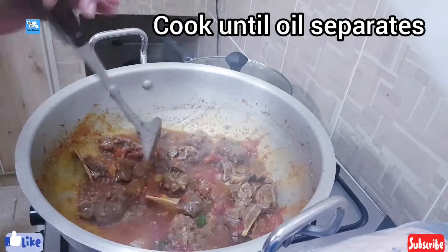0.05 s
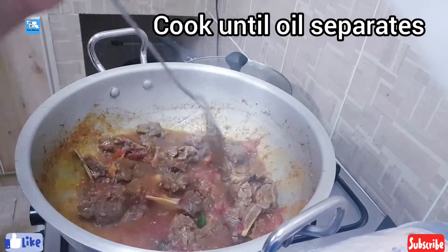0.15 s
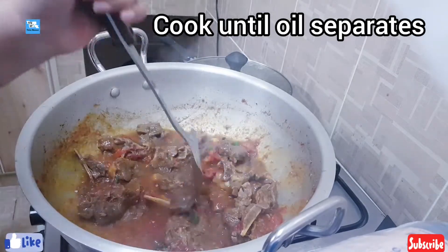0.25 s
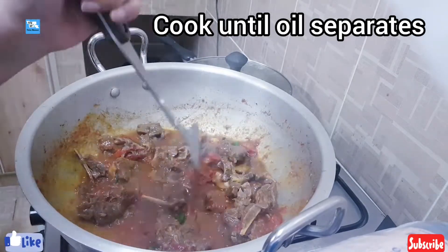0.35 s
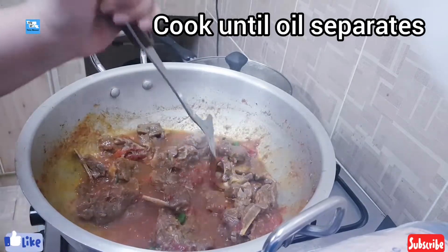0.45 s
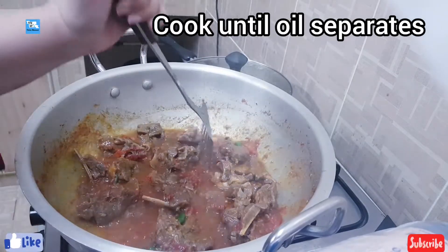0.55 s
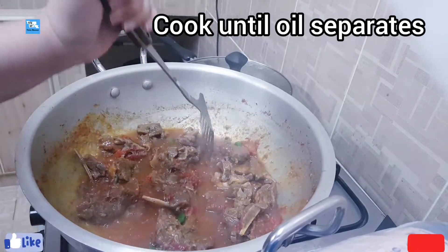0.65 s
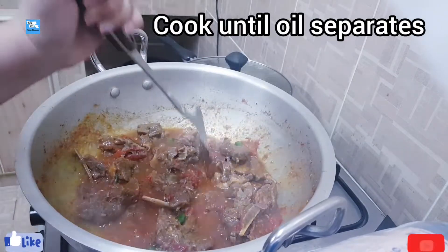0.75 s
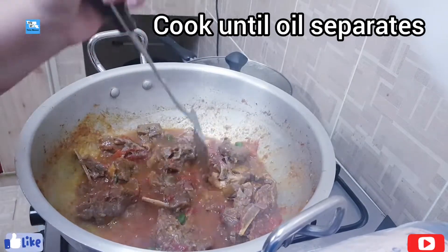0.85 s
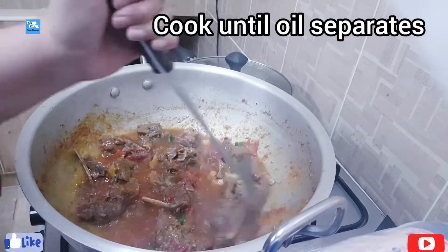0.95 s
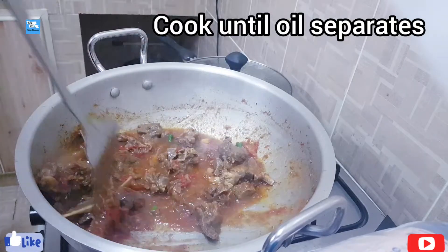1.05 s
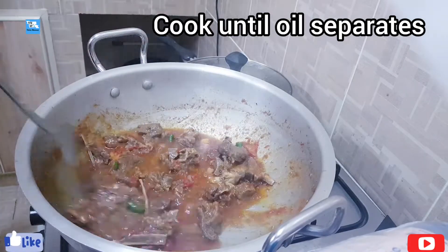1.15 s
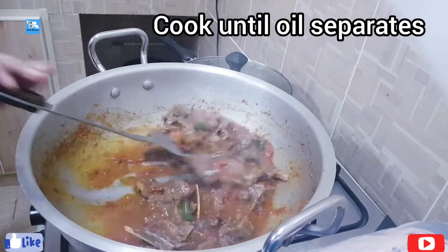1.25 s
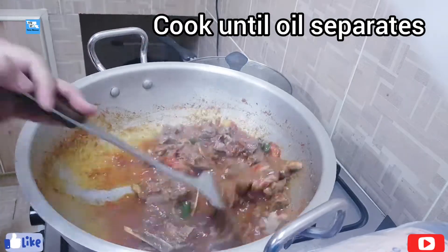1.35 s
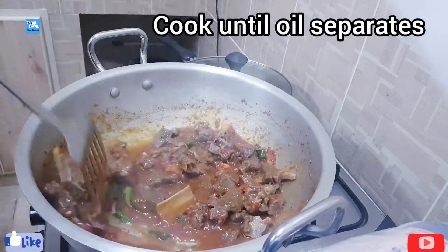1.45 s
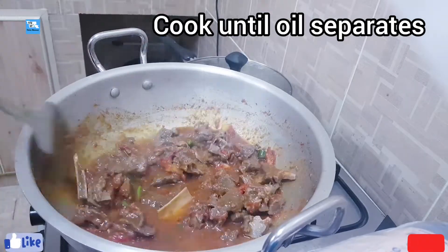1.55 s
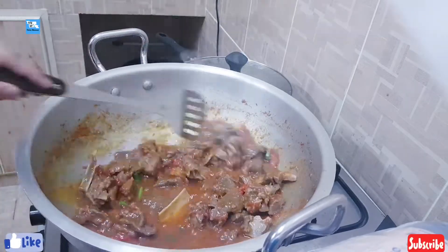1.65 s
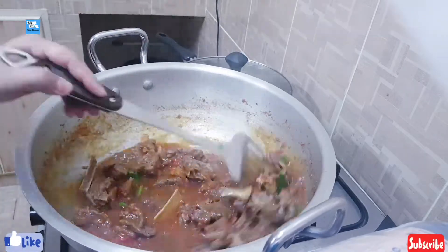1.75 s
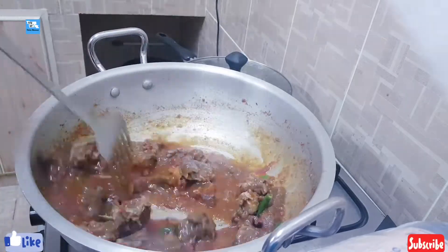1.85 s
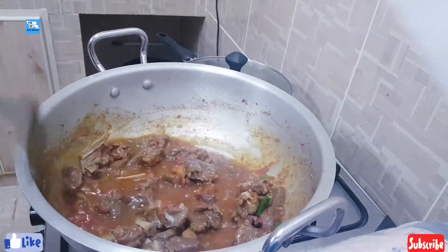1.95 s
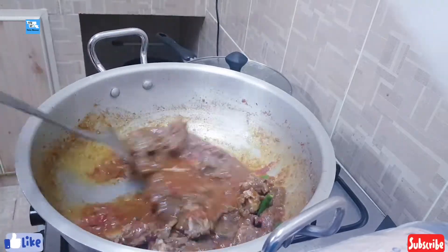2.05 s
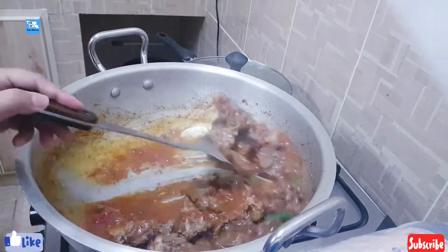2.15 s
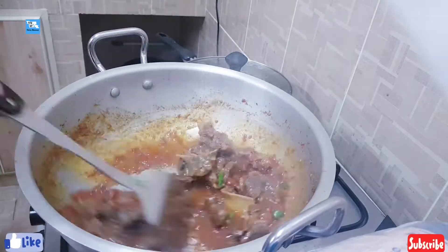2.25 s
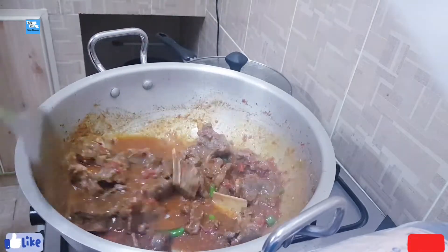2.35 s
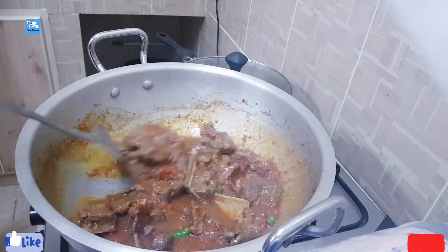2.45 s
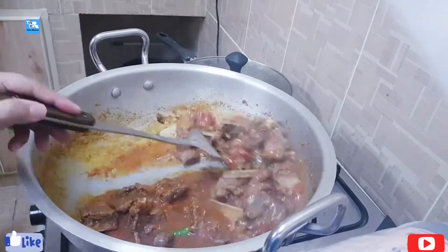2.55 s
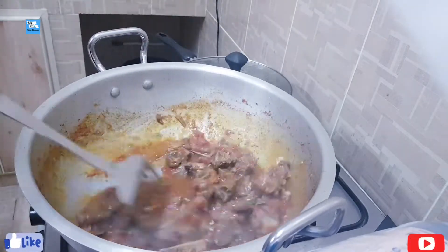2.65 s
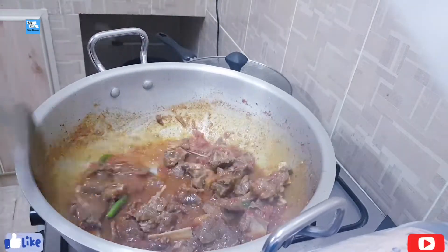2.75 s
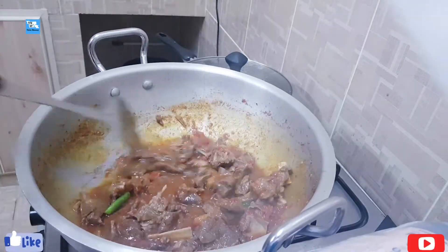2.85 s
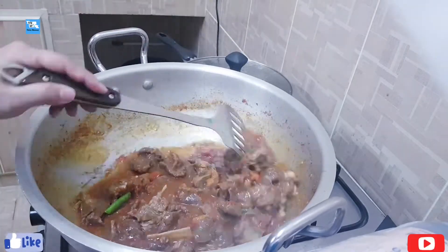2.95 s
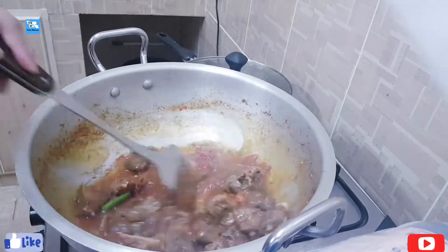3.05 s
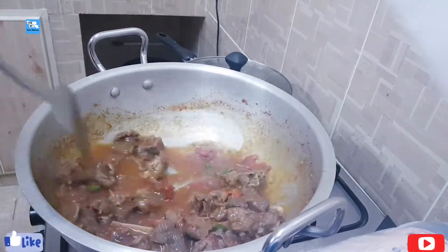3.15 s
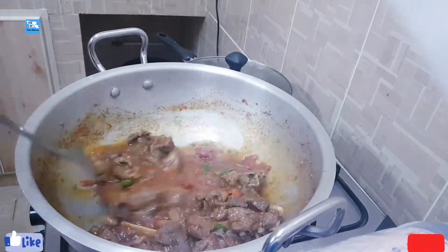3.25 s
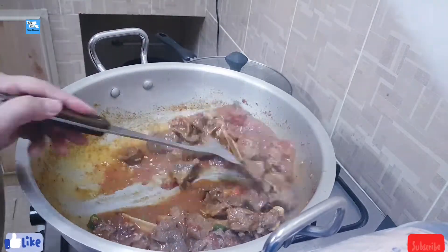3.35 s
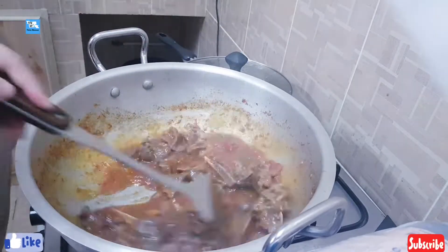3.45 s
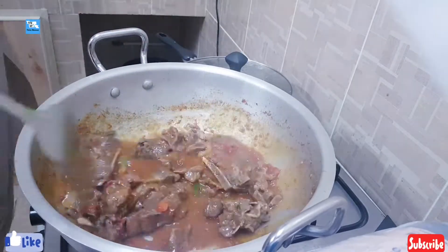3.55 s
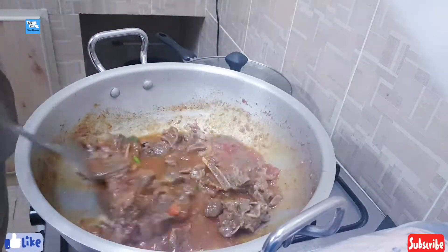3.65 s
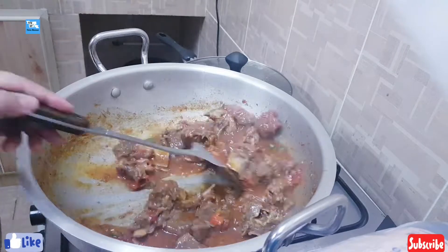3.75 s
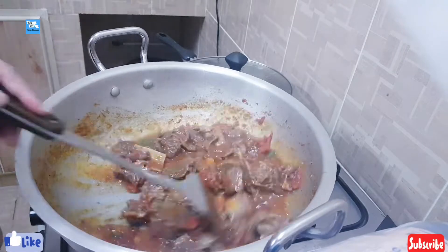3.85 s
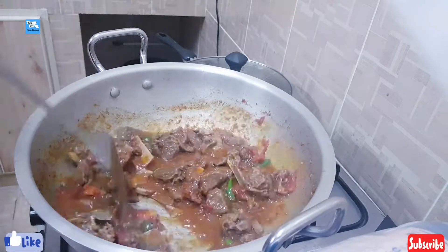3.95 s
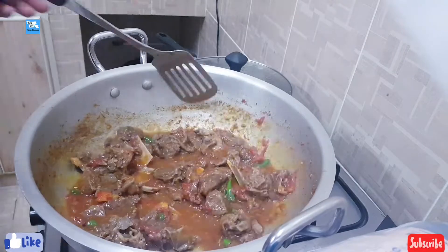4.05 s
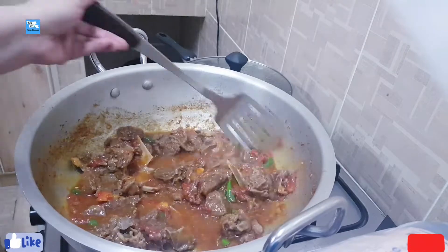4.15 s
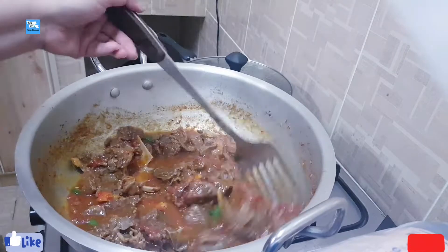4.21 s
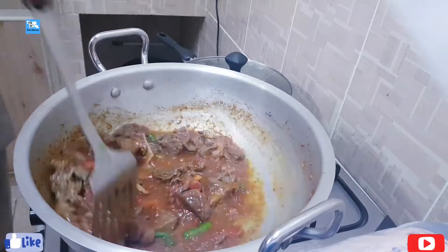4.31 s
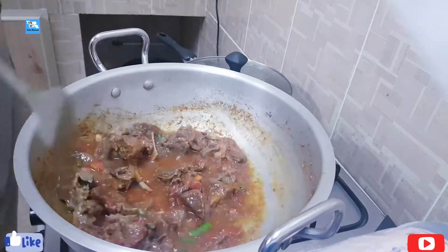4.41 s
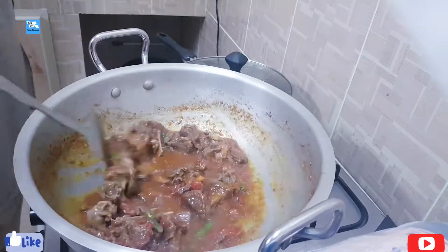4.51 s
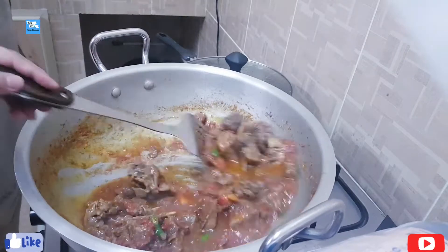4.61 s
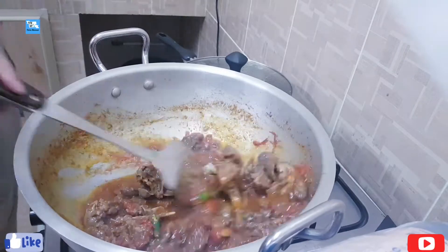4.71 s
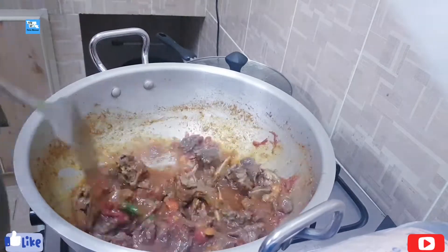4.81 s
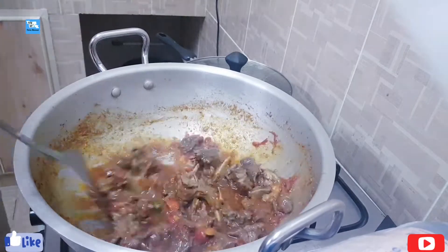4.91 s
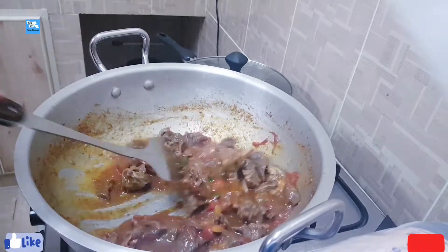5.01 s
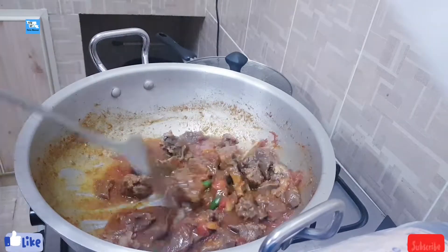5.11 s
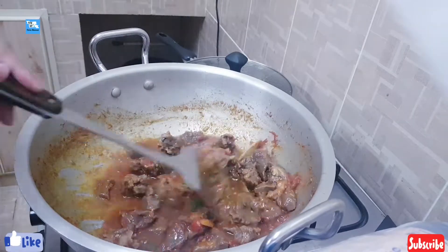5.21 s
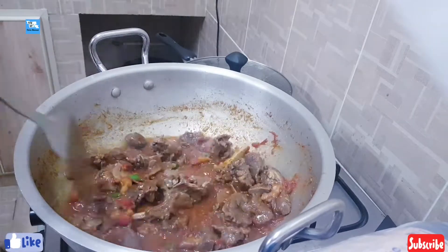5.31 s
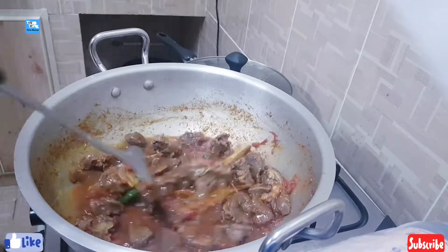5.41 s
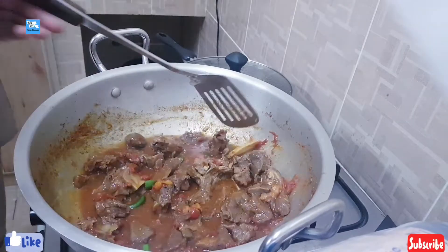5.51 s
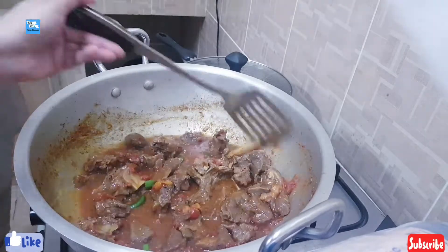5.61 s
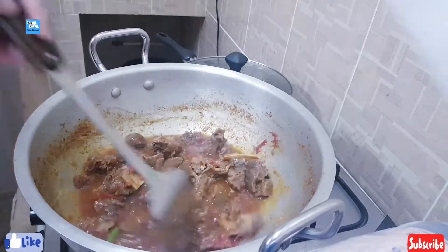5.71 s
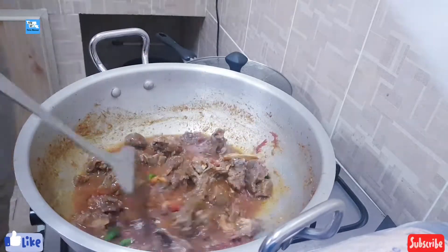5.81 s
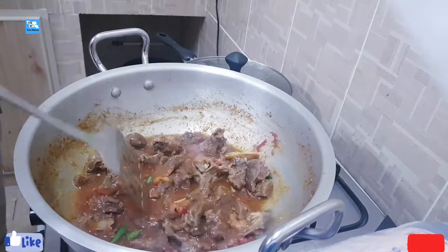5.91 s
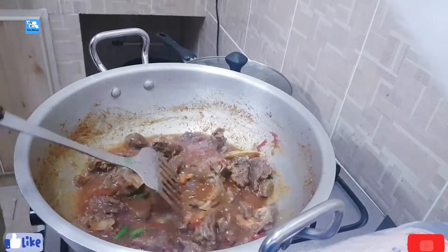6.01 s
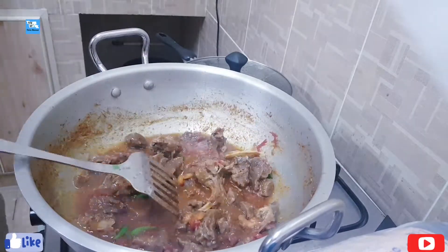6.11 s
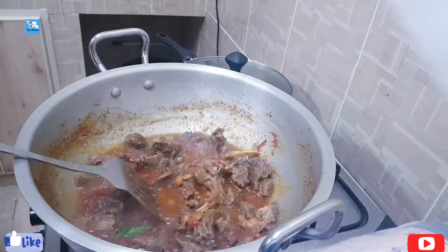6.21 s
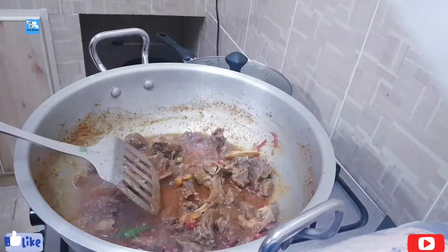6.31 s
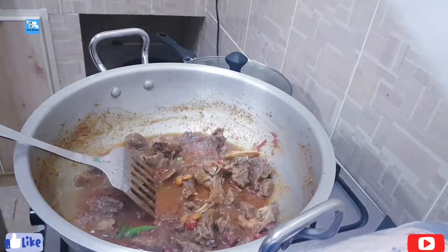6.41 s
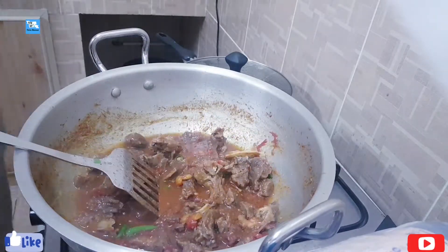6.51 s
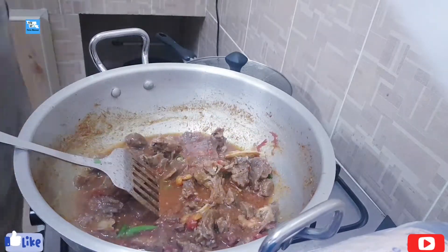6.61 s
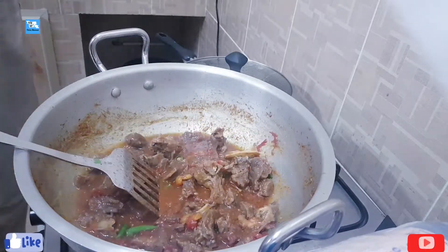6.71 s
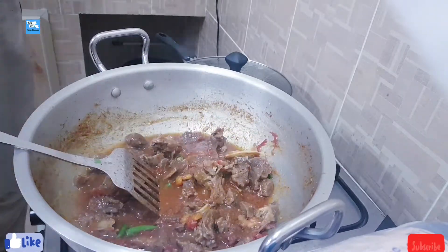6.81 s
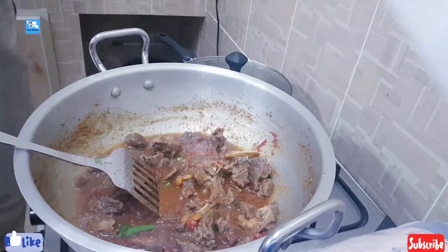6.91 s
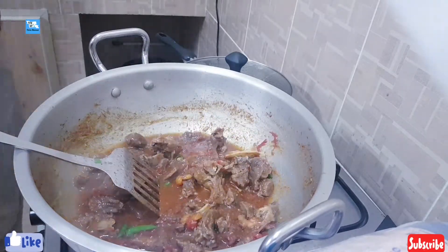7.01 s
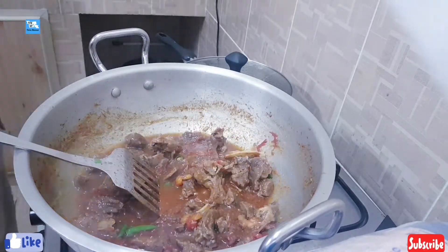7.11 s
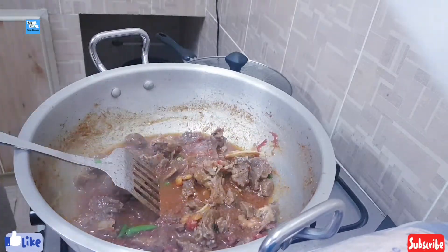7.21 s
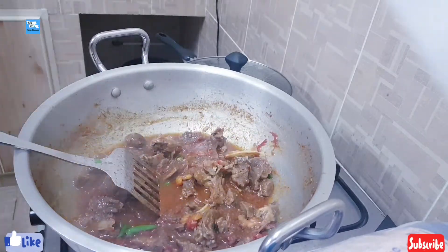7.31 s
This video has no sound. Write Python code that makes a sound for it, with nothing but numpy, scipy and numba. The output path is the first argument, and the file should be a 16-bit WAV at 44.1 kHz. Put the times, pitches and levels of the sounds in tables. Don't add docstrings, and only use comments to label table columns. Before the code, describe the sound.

A metal spatula knocks, clinks and scrapes around a wide aluminium pot of thick meat gravy, over faint burner hiss and a low extractor drone.

```python
import sys
import numpy as np
from scipy import signal
from scipy.fft import rfft, irfft, next_fast_len
from scipy.io import wavfile
from scipy.ndimage import uniform_filter1d
from numba import njit

SR = 44100
rng = np.random.default_rng(int(sys.argv[2]) if len(sys.argv) > 2 else 0)


def field_ratio(decibels):
    return 10 ** (np.asarray(decibels, dtype=float) / 20)


def log_audio(samples):
    frames = np.atleast_2d(samples).T
    limited = np.clip(frames, -1, 1)
    pcm = np.round(limited * 32767).astype(np.int16)
    wavfile.write(sys.argv[1], SR, pcm)


N = 324925
HOP = 32


def full(slow):
    return np.repeat(slow, HOP, axis=-1)[..., :N]


def walk(rate, count=1):
    hold, size = int(SR / rate / HOP), N // HOP + 1
    steps = np.repeat(rng.standard_normal((count, size // hold + 1)), hold, axis=1)
    return 1.666 * uniform_filter1d(steps, hold // 2, axis=1)[:, :size]


def strokes(rows, column, rise, sag, fall, build_db=0):
    t, table = np.arange(N // HOP + 1) * HOP / SR, np.transpose(rows)[:, :, None]
    since, length = t - table[0], table[1]
    level_db = table[column] - build_db * np.exp(-np.maximum(since, 0) / .05)
    level_db = level_db + np.minimum(rise * since, 0) - sag * np.clip(since, 0, length)
    return field_ratio(level_db - fall * np.maximum(since - length, 0))


def on_axis(table, size):
    hz, value = np.transpose(table)
    return np.interp(np.log(np.fft.rfftfreq(size, 1 / SR) + 1), np.log(hz + 1), value)


# (f/Hz, likeness 0-1)
LIKENESS = [(60, 0.99), (130, 1), (290, 0.81), (640, 0.37), (1400, 0), (4000, 0), (7000, 0.23),
            (15000, 0.88)]


def colour(pair, spectrum):
    size = next_fast_len(N)
    like = np.clip(on_axis(LIKENESS, size), 0, 1)
    shape = field_ratio(on_axis(spectrum, size))
    mid, side = rfft(pair, size) * shape * np.sqrt([1 + like, 1 - like])
    gain = np.sqrt(2 * np.mean(shape ** 2))
    return irfft(np.array([mid + side, mid - side]), size)[:, :N] / gain


def grit(scatter_db, share, count=1):
    sizes = np.minimum(rng.exponential(size=(count, N)), 2.5)
    ticks = (rng.random((count, N)) < share) * field_ratio(scatter_db * sizes)
    force = rng.standard_normal((count, N)) * (0.45 + ticks)
    return force / np.sqrt(np.mean(force ** 2))


def favour(modes, aim_hz, focus_db, octaves):
    hz, width, db = np.transpose(modes)[:, :, None]
    nearness = np.exp(-(np.log2(hz / aim_hz) / octaves) ** 2)
    weight = field_ratio(db + focus_db * nearness) * np.sqrt(width)
    return weight / np.sqrt(np.sum(weight ** 2, axis=0))


@njit
def ring(force, pole, turn):
    out = np.zeros((2, force.shape[1]))
    for m in range(len(pole)):
        z, norm = 0j, np.sqrt(2 * (1 - abs(pole[m]) ** 2))
        for i in range(force.shape[1]):
            z = z * pole[m] + force[m, i] * norm
            out[0, i] += z.imag
            out[1, i] += (z * turn[m]).imag
    return out


# (f/Hz, lead/radians)
PORT_PHASE = [(0, 0), (200, -.6), (500, -.9), (840, -.6), (905, -1.2), (1070, .4), (1310, .8), (1460, 2.2),
              (1840, -.3), (2100, 1.6), (2390, -1.1), (2620, 1.3), (3200, -.9), (3950, 1.2), (4440, 2.6),
              (4800, .4), (6130, 1.8), (6710, -.4)]


def body(modes, force, scrape, spot_hz, blows, aim_hz, focus_db, octaves, wander_db, damping, cut_hz, tick=0):
    hz, width, _ = np.transpose(modes)
    share = favour(modes, spot_hz, focus_db, octaves) * field_ratio(wander_db * walk(20, count=len(hz)))
    drive = full(share) * (scrape * force)
    beat = np.exp(-2j * np.pi * hz[:, None] * np.arange(SR // 10) / SR)
    for (at, push, first), aim in zip(blows, aim_hz):
        blow = push * force[0, at:at + len(push)]
        blow[0] += tick * first
        reach = np.minimum(np.linalg.norm(blow) / np.abs(beat @ blow), 4)[:, None]
        reach = reach ** np.exp(-(width[:, None] / 120) ** 2)
        drive[:, at:at + len(push)] += favour(modes, aim, focus_db, octaves) * reach * blow
    pole = np.exp((2j * hz - damping * width) * np.pi / SR)
    sign = (-1.) ** np.arange(len(hz))[:, None]
    turn = np.exp(-1j * np.interp(hz, *np.transpose(PORT_PHASE)))
    rung = ring(drive * sign + 1e-18, pole, turn)
    return signal.sosfilt(signal.butter(3, cut_hz, "high", fs=SR, output="sos"), rung)


# (f/Hz, level/dB per Hz)
GRIT_COLOUR = [(530, -19.5), (900, -22), (1080, -8), (1670, -8), (1990, -8.5), (2790, -13), (5320, -9),
               (9200, -18.5), (12200, -15.5), (15700, -25), (16500, -41)]
# (t/s, level/dB above the hiss)
SPITS = [
    (6.1877, 4),
    (6.3254, -1),
    (6.8372, 5),
    (7.0064, 3),
]


def simmer():
    per_s, usual_db, fade_ms = 70, -11, 2.5
    sizes = np.minimum(rng.exponential(size=N), 2)
    pops = (rng.random(N) < per_s / SR) * field_ratio(usual_db + 3.5 * sizes)
    for s, db in SPITS:
        pops[int(s * SR)] = field_ratio(db)
    fade = signal.lfilter([1], [1, -np.exp(-1000 / SR / fade_ms)], pops)
    fizz = colour(rng.standard_normal((2, N)), GRIT_COLOUR) * fade
    return signal.sosfilt(signal.butter(1, 2500, "high", fs=SR, output="sos"), fizz)


# (f/Hz, level/dB per Hz)
HISS = [(76, -12), (130, 0), (254, -8.5), (594, -5), (986, -10.5), (1280, -9), (1570, -11.5), (2830, -16),
        (11700, -29), (15200, -29), (16500, -48)]
# (t/s, level/dB)
HISS_LEVEL = [
    (0, -48),
    (.45, -46.5),
    (2.5, -46),
    (3.0, -47),
    (5.3, -51),
    (6.3, -47.5),
    (6.5, -45),
    (7.37, -44.5),
]


def burner():
    hiss_db = np.interp(np.arange(N) / SR, *np.transpose(HISS_LEVEL))
    flicker = full(field_ratio(0.5 * walk(17)))
    hiss = colour(rng.standard_normal((2, N)), HISS) * field_ratio(hiss_db) * flicker
    whistle = body([(2810, 30, 0)], rng.standard_normal((1, N)), field_ratio(hiss_db - 19), 2820, [], [],
                   focus_db=0, octaves=1, wander_db=1, damping=.6, cut_hz=2100)
    return hiss + whistle + field_ratio(hiss_db) * simmer()


# (f/Hz, level/dB per Hz)
RUMBLE = [(12, -50), (20, -2), (43, -8.5), (65, 5.5), (80, -11), (92, 11), (108, 1), (124, 0.5), (140, -4),
          (170, -37), (220, -49), (370, -120)]
# (t/s, length/s, level/dB)
SHAKES = [
    (.08, 0.44, -44),
    (.8, .1, -45.5),
    (1.4, 0.57, -42.5),
    (2.25, 0.19, -44.5),
    (2.6, 0.072, -40),
    (2.85, 0.06, -47),
    (3.55, 0.44, -46.5),
    (4.2, 0.061, -44),
    (6.45, 0.32, -47),
    (6.9, 0.41, -47.5),
]


def extractor():
    drone_db, slope = -49, 120
    shake = np.hypot(field_ratio(drone_db), strokes(SHAKES, 2, slope, 0, slope).sum(0))
    return colour(rng.standard_normal((2, N)), RUMBLE) * full(shake)


def kitchen():
    return burner() + extractor()


# (t/s, f/Hz, level/dB)
GROAN = [
    (2.71, 191.9, -46),
    (2.728, 187, -21),
    (2.766, 192.4, -45),
    (2.784, 212, -25),
    (2.8, 194, -37),
    (2.822, 174.5, -21),
    (2.838, 169, -33),
    (2.866, 142, -35),
    (2.9, 143, -43),
]


def groan():
    s, hz, db = np.transpose(GROAN)
    t = np.arange(N) / SR
    pitch = np.interp(t, s, hz) * (1 + 0.0447 * full(walk(60)[0]))
    phase = 2 * np.pi * np.cumsum(pitch) / SR
    fade = np.clip(np.minimum(t - s[0], s[-1] - t) / 0.0073, 0, 1)
    return np.sqrt(2) * field_ratio(np.interp(t, s, db)) * fade * (np.sin(phase) + 0.23 * np.sin(2 * phase))


# (f/Hz, width/Hz, level/dB)
STAND = [(131, 42, 6.5), (212, 45, 5), (190, 160, -6)]
# (t/s, length/s, level/dB)
ROCKS = [(.28, 0.043, -38), (.77, 0.021, -39.5), (.9, 0.082, -45.5), (1.305, 0.023, -40.5),
         (1.48, 0.062, -43), (1.58, 0.059, -32), (1.7, 0.037, -39), (2.36, 0.17, -46), (2.53, 0.05, -36),
         (2.8, 0.031, -33), (3.16, 0.045, -46.5), (3.82, 0.025, -36.5), (4.23, 0.097, -46),
         (4.5, 0.034, -48), (5.56, 0.11, -48.5)]


def stand_boom(slip):
    rock = strokes(ROCKS, 2, 380, 12, 380).sum(0)
    return body(STAND, grit(scatter_db=8.0, share=0.024), full(rock * slip), 190, [], [],
                focus_db=5, octaves=1, wander_db=-1.5, damping=1.17, cut_hz=106)


# (t/s, level/dB, f/Hz of the spot, swell/ms)
BUMPS = [(0.283, -27, 505, 3.7), (0.2953, -25, 495, 5.9), (0.3791, -23.5, 297, 2.3),
         (0.3831, -16.5, 510, 4.6), (0.452, -31, 894, 14.4), (0.441, -24, 835, 3.9), (0.445, -26, 493, 4.7),
         (0.7693, -23, 295, 3.8), (0.7713, -23.5, 586, 6.7), (0.7772, -21, 839, 4.9),
         (0.891, -25, 896, 3.2), (0.893, -24, 532, 6.4), (1.5615, -20, 597, 14.0), (1.5794, -22, 906, 19.8),
         (1.5824, -16, 904, 5.9), (1.6074, -26.5, 1055, 7.5), (1.6223, -20, 603, 5.2),
         (1.6323, -28, 835, 4.1), (1.6602, -26, 900, 5.2), (1.9137, -29.5, 520, 8.7),
         (2.7218, -26, 509, 8.1), (2.8006, -27.5, 376, 5.9), (2.8415, -22, 877, 5.1),
         (2.8425, -17.5, 590, 4.1), (3.2157, -30, 1070, 5.1), (3.6308, -30, 1080, 4.2),
         (4.0199, -27, 722, 6.4), (4.0199, -23.5, 1082, 13.4), (4.1236, -29, 1125, 6),
         (4.181, -23, 862, 5.4), (4.1865, -27.5, 1055, 9), (4.2194, -27.5, 1065, 4.6),
         (4.4868, -24, 827, 10.6), (4.4948, -17.5, 574, 3.3), (4.5137, -21, 520, 9.9),
         (4.5157, -23, 836, 2.6), (4.5367, -26, 274, 4.4), (4.9817, -11.5, 573, 3.2),
         (4.9857, -22, 1103, 2.8), (5.5983, -23, 850, 14.3), (0.293, -29.5, 257, 6.7),
         (5.6322, -30, 849, 7.2), (5.65, -36, 1072, 22),
         (1.073, -27, 517, 6), (1.22, -32.5, 687, 4.2), (1.308, -28, 217, 5.1), (2.427, -30, 442, 4.8),
         (2.548, -36.5, 260, 4.9), (3.312, -32, 410, 7), (3.838, -30, 272, 3), (3.855, -32, 910, 3),
         (4.973, -19.5, 576, 3.8), (4.989, -16.5, 524, 3.7), (5.64, -31, 315, 11), (5.7, -40, 323, 12),
         (6.345, -40, 654, 4.7), (6.345, -41, 328, 7.4)]
# (t/s, level/dB, f/Hz, swell/ms)
CLINKS = [(0.3771, -26.5, 1734, 7.4), (0.3801, -29, 4530, 7.4), (0.449, -28, 1530, 4.9),
          (0.452, -31, 4274, 4.0), (0.7742, -32.2, 6130, 4.3), (0.7742, -30.8, 5307, 5.1),
          (0.891, -32, 6761, 3.8), (1.4697, -28.5, 2100, 8.7), (1.4707, -25, 3170, 4),
          (1.5694, -27, 5800, 2.1), (1.5864, -31, 1445, 7.6), (1.9127, -28, 3180, 4.9),
          (1.9127, -23, 2120, 6.1), (1.9147, -28.5, 2637, 5.7), (2.3237, -30.5, 2607, 12.6),
          (2.7198, -18.6, 3206, 5.5), (2.7218, -21, 6750, 2.6), (2.7258, -22.6, 2110, 8.5),
          (3.1429, -30, 2074, 9.1), (3.1439, -23.5, 3090, 3.2), (3.1439, -15.5, 2423, 3.7),
          (3.629, -32, 5160, 3.5), (3.6288, -28, 4100, 3), (3.6727, -29.5, 1550, 5.3),
          (4.0219, -27, 1474, 8.4), (4.0229, -33, 2110, 7.2), (4.0269, -28, 2635, 5.2),
          (4.073, -26, 2620, 9), (4.0747, -37.5, 3080, 10), (4.0747, -35, 2120, 9.7),
          (4.228, -34.5, 2390, 8.1), (4.1875, -31.5, 1330, 5.6), (4.5108, -34, 1830, 4.7),
          (4.976, -22.5, 1810, 4.1), (4.9867, -17, 1520, 1.9), (5.5494, -33, 1310, 3),
          (5.5494, -37, 4340, 3.1), (5.5813, -32, 2640, 6.7), (5.6452, -33, 2100, 11.4),
          (5.65, -44, 2650, 7.2),
          (1.068, -33.5, 2620, 6.6), (1.071, -30.5, 3210, 7.8), (1.068, -33.5, 4230, 7.4),
         (1.069, -37, 5150, 5), (1.148, -34, 1196, 7.5), (1.98, -34, 1164, 6), (2.3247, -31.5, 2390, 16),
         (2.3247, -35, 3140, 8), (3.53, -33, 2640, 14), (3.535, -34, 3640, 11), (3.535, -35, 4520, 8),
         (3.536, -34, 2110, 8.5), (3.537, -31, 1464, 7.9), (4.19, -23, 722, 6.9), (1.912, -32, 5140, 4),
         (4.398, -31, 2100, 6.2), (4.387, -35, 3950, 17), (4.388, -35, 3190, 7.8), (4.402, -33, 2590, 9.4),
         (6.134, -42, 2620, 10), (3.144, -29, 6150, 4)]


def knocks():
    out, t = np.zeros((2, N + SR)), np.arange(SR // 5) / SR
    waver = 0.39 * full(walk(120)[0])
    for rows, onset in ((BUMPS, 0.905), (CLINKS, 0.398)):
        for s, db, hz, swell_ms in rows:
            u = t * 1000 / max(swell_ms, 1) * (1 + onset) / 2
            at = int((s - onset * swell_ms / 4000) * SR)
            lead = np.interp(hz, *np.transpose(PORT_PHASE)) + 0.8 * waver[-at]
            phase = 2 * np.pi * hz * t + waver[at:at + len(t)] - np.array([[0], [lead]])
            swell = (u / onset) ** onset * np.exp(onset - u)
            out[:, at:at + len(t)] += field_ratio(db) * swell * np.sin(phase)
    return out[:, :N]


# (t/s, length/s, grit level/dB, wall level/dB, wall f/Hz)
DRAGS = [
    (1.068, 0.16, -37, -34, 670),
    (1.919, 0.15, -35, -37, 680),
    (2.326, 0.16, -33, -31.5, 541),
    (3.165, 0.13, -33, -39, 643),
    (3.537, 0.18, -33.5, -37.5, 616),
    (4.009, 0.25, -40.5, -37, 1070),
    (4.383, 0.18, -34, -39.5, 630),
    (5.564, 0.09, -35.5, -37.5, 330),
]
# (t/s, length/s, grit level/dB, wall level/dB, wall f/Hz)
SKIDS = [
    (0.37, 0.17, -42, -36, 572),
    (0.76, 0.041, -35.5, -37.5, 635),
    (0.891, 0.097, -48.5, -43, 690),
    (1.473, 0.14, -33.5, -35, 571),
    (2.716, 0.12, -38.5, -33.5, 478),
    (4.969, 0.08, -48, -38, 535),
]
# (t/s, length/s, grit level/dB, wall level/dB, wall f/Hz)
SWIPES = [(0.149, 0.074, -51.5, -51, 490), (1.311, 0.062, -43, -46, 354), (1.747, 0.027, -41, -42, 483),
          (2.162, 0.047, -44.5, -44, 557), (2.571, 0.038, -39, -42.5, 355), (2.965, 0.057, -42, -45.5, 600),
          (3.395, 0.054, -43.5, -44, 960), (3.81, 0.079, -40, -42.5, 335), (4.672, 0.026, -42, -42, 576),
          (4.868, 0.074, -48.5, -56, 595), (5.207, 0.049, -47.5, -49, 646), (5.375, 0.02, -51, -53.5, 590),
          (5.817, .04, -58, -54, 560), (5.944, .08, -56, -56, 540)]
# (t/s, length/s, wall level/dB, wall f/Hz)
TUMBLES = [(0.287, 0.012, -33, 513), (0.38, 0.016, -22.5, 488), (0.436, 0.019, -37, 530),
           (0.726, .025, -28, 750), (0.768, 0.015, -26.5, 623), (0.899, 0.015, -28.5, 630),
           (1.559, 0.081, -21, 615), (1.652, 0.049, -31.5, 724), (2.145, 0.028, -31.5, 542),
           (2.528, 0.035, -41.5, 275), (2.832, 0.033, -25, 604), (3.212, 0.023, -35, 720),
           (3.307, 0.067, -41.5, 420), (3.812, 0.046, -34.5, 275), (4.01, 0.028, -41, 1076),
           (4.174, 0.05, -28.5, 850), (4.481, 0.066, -20, 564), (4.976, 0.0068, -39.5, 610),
           (5.585, 0.06, -28, 854), (5.65, 0.044, -35, 745)]


def stirring():
    drag, swipe = (2300, 5, 288), (600, 12, 215)  # rise, sag, fall in dB per s
    forth = strokes(DRAGS, 2, *drag, build_db=12).sum(0) + strokes(SKIDS, 2, *drag).sum(0)
    back = strokes(SWIPES, 2, *swipe).sum(0)
    chatter = strokes([(s, .045, -45.5) for s, *_ in DRAGS], 2, *drag).sum(0)
    loose = field_ratio(-3) * strokes(TUMBLES, 2, 1400, 73, 333)
    rub = np.vstack([strokes(DRAGS + SKIDS, 3, *drag), strokes(SWIPES, 3, *swipe), loose])
    pitches = np.array([row[-1] for row in DRAGS + SKIDS + SWIPES + TUMBLES])
    return forth, back, chatter, rub.sum(0), pitches[rub.argmax(0)]


# (t/s, blade level/dB, wall level/dB, wall f/Hz, blade f/Hz)
TAPS = [(1.5617, -30, -23, 586, 1460), (1.57, -24, -26, 610, 1430), (1.5869, -20.5, 1, 895, 4620),
        (1.6641, -25.5, -18, 884, 1820), (1.307, -27, -25, 1000, 1720), (2.549, -26, -30, 1150, 1430),
        (3.631, -15, -16.5, 480, 1670), (4.123, -23, -25, 1070, 2100), (4.858, -32.5, -33, 332, 6430),
        (5.148, -37, -27.5, 950, 1730), (5.549, -19, -19, 634, 5000), (5.579, -25, -17, 830, 2600),
        (5.811, -37, -36, 275, 5300), (5.9324, -38.5, -42, 396, 5070),]
# (t/s, blade level/dB, wall level/dB, wall f/Hz, blade f/Hz)
STRIKES = [
    (0.891, -17, -5.5, 892, 1300),
    (1.4694, -15.5, -26, 515, 2900),
    (1.913, -24, -23, 503, 2350),
    (2.138, -26, -20, 485, 2020),
    (2.3224, -24.5, -48, 520, 2500),
    (3.052, -29.5, -31, 607, 1430),
    (3.1423, -11, -19, 513, 2480),
    (4.184, -24, -14, 860, 1430),
    (4.39, -26, -35, 513, 3560),
    (6.345, -35, -23, 650, 1660),
]
# (t/s, blade level/dB, wall level/dB, wall f/Hz, blade f/Hz)
NUDGES = [
    (0.153, -33.5, -48, 633, 2960),
    (0.407, -28, -41, 453, 1840),
    (0.5647, -38, -22.5, 1070, 1460),
    (0.7229, -25, -10, 883, 1630),
    (0.7712, -13.5, -19, 580, 1700),
    (2.7181, -10, -24, 510, 2830),
    (4.229, -39, -24, 1070, 2380),
    (4.513, -35, -8.5, 484, 1840),
    (5.5975, -31, -35, 860, 1440),
    (5.649, -25, -38, 330, 2390),
]
# (t/s, blade level/dB, wall level/dB, wall f/Hz, blade f/Hz)
SHOVES = [(0.281, -46, -20, 500, 1480), (0.374, -15, -8, 537, 1700), (0.4462, -16, -20, 477, 1640),
          (0.5162, -29, -24, 1180, 1460), (1.066, -25, -52, 510, 2620), (1.123, -24.5, -30, 425, 4930),
          (2.47, -28, -27, 1150, 1700), (2.843, -33.5, -25, 860, 2620), (3.529, -27.5, -20.5, 556, 2670),
          (4.021, -18, -21, 1070, 1280), (4.073, -21, -50, 1080, 2730), (4.4906, -23.5, -19, 570, 1750),
          (4.977, -15, -13.5, 600, 1680), (6.137, -39, -31.5, 378, 2620), (6.44, -37, -25, 1070, 2400)]


def blow_columns():
    _, blade_db, wall_db, wall_hz, blade_hz = np.transpose(TAPS + STRIKES + NUDGES + SHOVES)
    return blade_db, wall_db, wall_hz, blade_hz


def pushes(stretch, peak_db):
    t_ms = np.arange(int(.1 * SR)) * 1000 / SR
    kinds = [(TAPS, 3.75, True), (STRIKES, 6.7, True), (NUDGES, 6.7, False), (SHOVES, 8.7, False)]
    blows = [(row[0], ms, hard) for rows, ms, hard in kinds for row in rows]
    out = []
    for (s, contact_ms, hard), db in zip(blows, peak_db):
        u = t_ms / max(contact_ms * stretch, .2)
        shape = np.exp(-u / 2) if hard else u * np.exp(1 - u)
        lead_s = 1e-3 if hard else 0.00041 * contact_ms
        out.append((int((s - lead_s) * SR), shape * field_ratio(db), hard * field_ratio(db)))
    return out


# (f/Hz, width/Hz, level/dB)
WALL = [(275, 69, -3), (355, 155, -2), (420, 105, -5), (513, 69.5, 4), (537, 69, -1.5), (600.6, 134, -5),
        (708.5, 83, -2), (745, 123, 2), (876.3, 107, 2.5), (906, 71, 5), (1028, 55, -0.5),
        (1070, 16.3, 2.5), (1150, 41, -5.5), (1340, 72, -8.5)]


def wall_knock(rub, spot_hz, slip):
    _, wall_db, wall_hz, _ = blow_columns()
    return body(WALL, grit(scatter_db=3.0, share=.06), full(rub * slip), spot_hz,
                pushes(stretch=0.66, peak_db=wall_db - 9.0), wall_hz,
                focus_db=12, octaves=.11, wander_db=1.8, damping=1.2, cut_hz=220, tick=11)


# (f/Hz, width/Hz, level/dB)
BLADE = [(1460, 42, 1), (1700, 13, -13), (1840, 61, -12.5), (2100, 51, -1), (2125, 44, -8), (2390, 45, -4),
         (2620, 36, -3.5), (2900, 12, -9), (3060, 11, -12), (3178, 63, -8), (3620, 22, -9.5),
         (3900, 27, -6), (4275, 107, -2.5), (4740, 21, -4.5), (4520, 32, -5.5), (5150, 48, -9.5),
         (6144, 95, -3.5), (5630, 35, -18), (6430, 19, -5.5), (6720, 79, -9), (7240, 230, -10.5)]


def blade_ring(forth, back, chatter, slip):
    blade_db, _, _, blade_hz = blow_columns()
    sing = field_ratio(-3.5) * forth + field_ratio(-7) * back
    spot_hz = np.where(chatter > sing, 2500, 1810)
    return body(BLADE, grit(scatter_db=4.0, share=0.18), full((sing + chatter) * slip), spot_hz,
                pushes(stretch=0.78, peak_db=blade_db - 10.0), blade_hz,
                focus_db=12, octaves=.24, wander_db=1.6, damping=1.2, cut_hz=1200, tick=10)


def patchy(pair, patchy_db, rate, count):
    size = next_fast_len(N)
    bins, edges = rfft(pair, size), np.linspace(0, size // 2 + 1, count + 1).astype(int)
    out = 0
    for lo, hi, gain in zip(edges, edges[1:], field_ratio(patchy_db * walk(rate, count=count))):
        band = np.zeros_like(bins)
        band[:, lo:hi] = bins[:, lo:hi]
        out = out + irfft(band, size)[:, :N] * full(gain)
    return out


def scrape_hiss(scrape, slip):
    blade_db, _, _, blade_hz = blow_columns()
    grains = grit(scatter_db=1.0, share=0.12, count=2)
    crack = full(scrape * slip)
    snap_db = 2 * np.clip(np.log2(blade_hz / 1900), -.4, .4)
    for at, push, first in pushes(stretch=0.98, peak_db=blade_db - 18.0 + snap_db):
        crack[at:at + len(push)] += push
        crack[at:at + SR // 700] += 0.3 * first
    spark = np.zeros(N)
    spark_db = 2 * blade_db + 0.5 + 16 * np.log2(blade_hz / 2500)
    for at, push, _ in pushes(stretch=0.83, peak_db=spark_db):
        spark[at:at + len(push)] += push
    band = signal.butter(2, [8500, 1.75 * 8500], "band", fs=SR, output="sos")
    spark = signal.sosfilt(band, grains * spark)
    return spark + colour(patchy(grains, patchy_db=2.0, rate=30, count=9) * crack, GRIT_COLOUR)


def spatula():
    forth, back, chatter, rub, spot_hz = stirring()
    slip = field_ratio(1.34 * walk(150)[0])
    pot = groan() + stand_boom(slip) + knocks() + wall_knock(rub, spot_hz, slip)
    return pot + blade_ring(forth, back, chatter, slip) + scrape_hiss(forth + back, slip)


def scene():
    room_t60_s, room_db = .28, -15
    pot = spatula()
    t = np.arange(int(.4 * SR)) / SR
    tiles = rng.standard_normal((2, len(t))) * field_ratio(-60 * t / room_t60_s) * (t > .004)
    tiles = signal.lfilter([1], [1, -.5], tiles)
    tiles = tiles / np.sqrt(np.sum(tiles ** 2) / 2)
    echo = signal.fftconvolve(pot, tiles, axes=1)[:, :N]
    return pot + field_ratio(room_db) * echo + kitchen()


def top_cut(x):
    return signal.sosfilt(signal.butter(12, 16600, fs=SR, output="sos"), x)


# (f/Hz, left minus right level/dB)
BALANCE = [(60, 0.5), (130, -2), (250, -0.5), (500, 1), (1000, -1), (2000, -0.4), (4000, -1.2), (8000, 0.5),
           (15000, 4.5)]


def record(dry):
    size = next_fast_len(N)
    lean = on_axis(BALANCE, size) / 2
    ports = irfft(rfft(dry, size) * field_ratio(np.array([lean, -lean])), size)[:, :N]
    ports = signal.sosfilt(signal.ellip(8, .3, 40, 15750, fs=SR, output="sos"), ports)
    return top_cut(ports)


dry = scene()
out = record(dry)
log_audio(out)
```